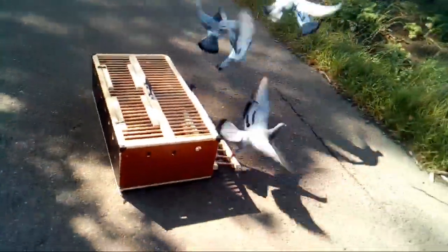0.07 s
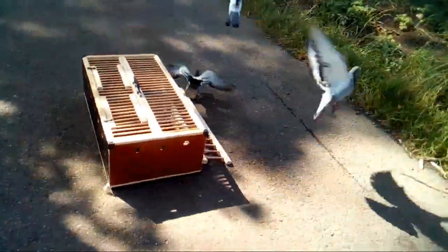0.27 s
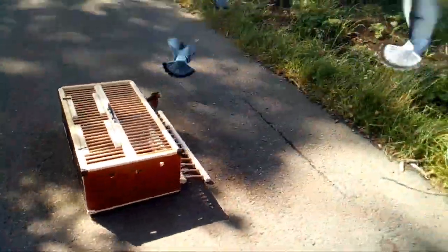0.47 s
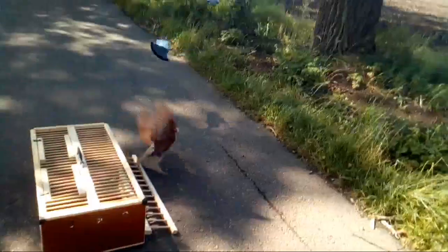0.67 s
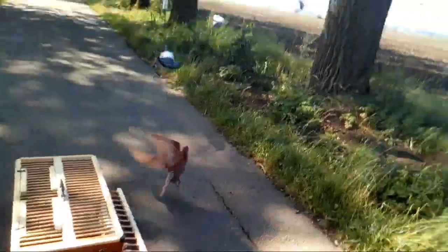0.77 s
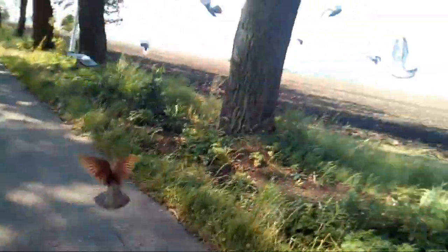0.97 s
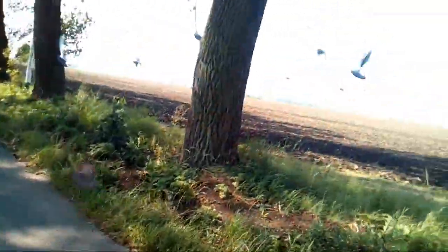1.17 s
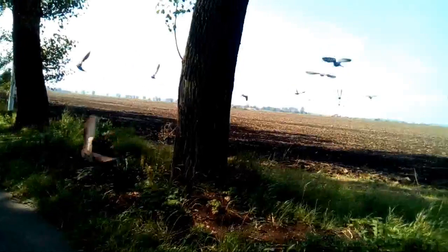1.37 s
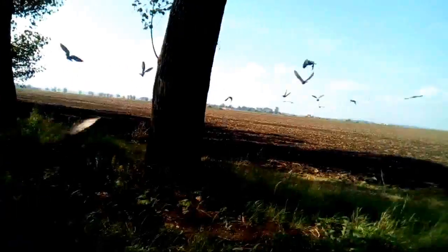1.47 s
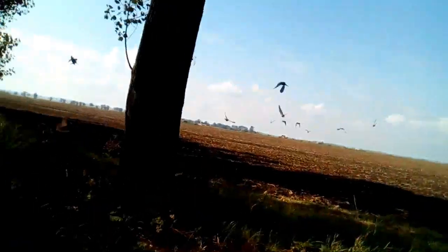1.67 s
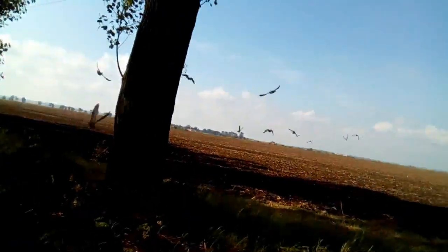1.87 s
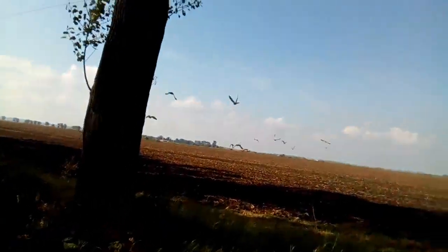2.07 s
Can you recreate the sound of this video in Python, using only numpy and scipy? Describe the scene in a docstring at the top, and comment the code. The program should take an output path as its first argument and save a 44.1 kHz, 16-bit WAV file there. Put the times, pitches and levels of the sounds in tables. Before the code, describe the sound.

Pigeons burst into flight close to the microphone outdoors, their wings clapping and fluttering in an uneven flurry. The wingbeats thin out as the birds fly off, and a light breeze swells into low, thumping wind buffeting at the end.

```python
"""A country road: a flock of pigeons bursts from a basket and flies off over a field.
Wing tips clap, each downstroke pushes a whoosh of air and the feathers rustle, all fading with distance.
A light breeze touches a small microphone that rings near 4 kHz; at the end a gust buffets it."""
import sys
import numpy as np
from scipy import signal
from scipy.fft import rfft, irfft
from scipy.io import wavfile
from scipy.ndimage import uniform_filter1d

SR = 44100
rng = np.random.default_rng(int(sys.argv[2]) if len(sys.argv) > 2 else 0)


def inscribe(sig):
    """Save sig as 16-bit PCM at rate SR to the path in sys.argv[1].

    A 1-D sig is mono; a 2-D sig holds one channel per row.
    Samples are clipped to [-1, 1] before scaling.
    """
    pcm = np.round(np.clip(np.atleast_2d(sig).T, -1, 1) * 32767)
    wavfile.write(sys.argv[1], SR, pcm.astype(np.int16))


N = 93888
T = np.arange(N) / SR


def undb(db):
    """Decibels to gain."""
    return 10 ** (np.asarray(db) / 20)


def unit(x):
    """Scale to rms 1."""
    return x / np.sqrt(np.mean(x ** 2))


def fader(rows, column=1):
    """Gain over time from one dB column of a table."""
    rows = np.array(rows)
    return undb(np.interp(T, rows[:, 0], rows[:, column]))


def eq(x, points):
    """Minimum-phase filter through (Hz, dB) points, so nothing rings ahead of a hit."""
    size = 2 * len(x)
    hz, db = np.array(points).T
    bins_hz = np.maximum(np.fft.rfftfreq(size, 1 / SR), 1)
    gain = undb(np.interp(np.log(bins_hz), np.log(hz), db))
    cepstrum = irfft(np.log(gain))
    cepstrum[1:len(x)] *= 2
    cepstrum[len(x) + 1:] = 0
    return irfft(rfft(x, size) * np.exp(rfft(cepstrum)))[:len(x)]


def wander(per_second):
    """Smooth random movement with rms 1."""
    hold = max(int(SR / per_second), 2)
    steps = rng.standard_normal(N)[np.arange(N) // hold]
    return unit(uniform_filter1d(steps, hold))


# A clap's three tones: bright snap, mid body, crisp edge. Each row: frequency in Hz, gain in dB.
SNAP_EQ = [(300, -11), (1500, 5.5), (2900, 4), (3900, 3.5), (5400, -4), (6800, -13), (7900, -31),
           (15000, -42)]
BODY_EQ = [(80, -29), (250, -7), (700, -0.5), (1900, 5), (3000, -2), (4200, -19.5), (8000, -59)]
EDGE_EQ = [(2000, -21.5), (5000, 2), (6800, 8.5), (8000, -2.5), (10500, -3.5), (13000, -16), (15500, -10.5)]
# The wing claps. Each row: start in seconds, relative snap level in dB, body and edge in dB against
# the snap, snap pitch in Hz, feather decay in ms.
WING_CLAPS = [(.006, -29, -18, -18, 3620, 4.3), (.078, -28.5, -25.5, -24, 3680, 3),
              (.0855, -33, -9, -20, 3570, 2.6), (.1232, -27.5, -4.5, -20.5, 3760, 3.2),
              (.137, -25.5, -17, -22, 3950, 3.9), (.189, -32.5, 4.5, -32, 3700, 5),
              (0.2006, -26, -0.5, -20, 3680, 0.89), (0.225, -20.5, -9, -28, 3940, 6.3),
              (.234, -27, -22, -24, 3800, 3.8), (.2395, -34, -21, -17, 3800, 1.9),
              (0.3053, -28.5, 1.5, -22, 3300, 2.6), (.318, -36, 0, -32.5, 3700, 1.44),
              (0.3403, -32, 1, -33, 3820, 2.5), (0.3936, -23.5, -11, -26, 3950, 8.5),
              (0.4244, -30, -13, -17, 3670, 8.2), (0.4634, -23.5, -5, -23, 3700, 4.2),
              (0.4934, -21.5, -13.5, -31, 3600, 1.4), (0.5193, -19, -9.5, -30, 3030, 2.7),
              (.541, -27.5, -5, -22, 3830, 0.8), (0.5619, -21, -6.5, -32, 3800, 1.9),
              (.598, -37.5, 4.5, -36.5, 3400, 3.7), (0.61, -38, 3, -36.5, 3540, 3.5),
              (0.655, -29, -12, -34.5, 3400, 5.8), (0.6761, -19.5, -9.5, -29, 3960, .9),
              (.680, -19, -7.5, -32, 3500, 1.1), (0.7597, -27.5, -3, -27, 4000, 8.6),
              (0.8, -30, -4, -16, 3600, 0.76), (0.9731, -21.5, -4, -22.5, 3430, 3.2),
              (1.0079, -36, -3, -14, 3830, 3.4), (1.0251, -29.5, -1.5, -12, 3700, 0.44),
              (1.0829, -22.5, -3.5, -25, 3500, 4.9), (1.119, -31.5, -3, -25, 3800, 1.5),
              (1.194, -32.5, -6.5, -21, 3760, 3), (1.2662, -36, -9, -19, 4030, 1.6),
              (1.3196, -30.5, -5.5, -25.5, 3660, 0.67), (1.351, -30.5, 0, -24, 4070, 4.9),
              (1.4201, -34, 2.5, -25, 3900, 4.2), (1.4298, -36, 2.5, -22, 3630, 1.2),
              (1.4917, -33, 1.5, -24, 4000, 5.6), (1.5507, -28.5, -2.5, -27, 3960, 1.6),
              (1.78, -28, -15, -23, 4060, 1.2), (1.898, -30.5, 0, -20, 4070, 3.2)]


def wing_claps(size=2048):
    """Wing tips meet: a crack, a spray of feather contacts and a bounce off the road."""
    feathers_db, bounce_db, trim_db = 1, -10, -13
    out, t = np.zeros(N), np.arange(size) / SR
    for start, db, body_db, edge_db, hz, decay_ms in WING_CLAPS:
        spray = unit(rng.standard_normal(size) * np.exp(-t * 1000 / decay_ms))
        hit = unit(signal.unit_impulse(size)) + undb(feathers_db) * np.sqrt(decay_ms) * spray
        bounce_s = .0025 * rng.uniform(.8, 1.2)
        hit = hit + undb(bounce_db) * np.roll(hit, int(bounce_s * SR))
        width_hz = min(3100 * undb(body_db), hz)  # a flat slap is broad, a tip flick rings narrowly
        ring = signal.lfilter(*signal.iirpeak(hz, hz / width_hz, SR), hit)
        snap = unit(eq(ring, SNAP_EQ))
        body = undb(body_db) * unit(eq(hit, BODY_EQ))
        edge = undb(edge_db) * unit(eq(hit, EDGE_EQ))
        onset = int(start * SR)
        out[onset:onset + size] += undb(db + trim_db) * (snap + body + edge)
    return out


def roadside_scatter(x, t60_s=.36, wet_db=-20.5):
    """Basket, verge and tree trunks scatter a short, faint tail."""
    tail = rng.standard_normal(N) * np.exp(-np.log(1000) * T / t60_s)
    return x + undb(wet_db) * signal.fftconvolve(x, tail / np.linalg.norm(tail))[:N]


def swirl(octaves=7, flicker_db=3):
    """Turbulent air: octave bands that each flicker on their own."""
    out = np.zeros(N)
    for hz in 100 * 2. ** np.arange(octaves):
        band = signal.lfilter(*signal.iirpeak(hz, np.sqrt(2), SR), rng.standard_normal(N))
        out += band * undb(flicker_db * wander(60.36))
    return out


# The full whoosh and the papery rustle. Each row: frequency in Hz, gain in dB.
WHOOSH_EQ = [(30, -21), (70, -0.5), (130, -3), (300, -0.5), (650, 1.5), (1300, -1), (2300, -5.5),
             (4000, -10.5), (6500, -26), (8000, -59.5), (15000, -79)]
RUSTLE_EQ = [(200, -22.5), (1200, -3.5), (2500, -15), (3200, -1.5), (3800, 3), (4800, -6.5), (5700, -15),
             (6700, -23.5), (7900, -38.5), (10500, -45), (14000, -34)]
# The flock fades away. Each row: time in seconds, whoosh level in dB, rustle level in dB.
FLOCK_FADE = [(0, -37.5, -45), (.2, -40, -40), (.36, -39.5, -39.5), (.52, -40, -42.5), (.66, -39.5, -38.5),
              (.82, -44.5, -43), (.95, -41.5, -44), (1.15, -47.5, -57), (1.42, -52.5, -66), (1.6, -60, -51),
              (2.13, -94, -58)]


def flapping(birds=5):
    """The birds beat out of step, each at its own rate; every stroke moves air and rustles feathers."""
    beat_hz, beat_drift, sharpness = 8.9, .03, 4.8
    waver_db, grain_db = 1.55, 3
    steady_share = .57  # rush of air between the strokes
    power = np.zeros(N)
    for bird in range(birds):
        rate_hz = beat_hz * (1 + beat_drift * wander(5.42))
        phase = np.cumsum(rate_hz) / SR + bird / birds
        downstrokes = np.exp(sharpness * (np.cos(2 * np.pi * phase) - 1))
        power += (downstrokes * undb(waver_db * wander(9.8))) ** 2
    strokes = unit(np.sqrt(power + steady_share ** 2 * power.mean()))
    whoosh = unit(eq(strokes * swirl(), WHOOSH_EQ))
    feathers = undb(grain_db * wander(900)) * rng.standard_normal(N)
    rustle = unit(eq(strokes * feathers, RUSTLE_EQ))
    return whoosh * fader(FLOCK_FADE, column=1) + rustle * fader(FLOCK_FADE, column=2)


# Single downstrokes that stand out as soft puffs.
# Each row: peak time in seconds, level in dB, band centre in Hz, half length in ms.
WING_PUFFS = [(.105, -34.5, 420, 6.9), (0.137, -37.5, 287, 5.5), (0.205, -33, 620, 7.2),
              (0.235, -38, 600, 6.7), (.32, -37, 377, 4.06), (.368, -41.5, 1180, 17),
              (0.42, -35.5, 391, 6.2), (.497, -41.5, 160, 4.4), (0.661, -42, 387, 7.5),
              (.835, -42.5, 433, 17), (1.18, -43.5, 287, 8.6), (1.221, -40.5, 457, 4.5),
              (1.536, -40.5, 1020, 3.8)]


def wing_puffs():
    """A wing close by shoves a short swell of air."""
    out = np.zeros(N)
    for peak_s, db, hz, half_ms in WING_PUFFS:
        band = signal.iirpeak(hz, Q=1, fs=SR)
        swell = np.exp(-.5 * ((T - peak_s) * 1000 / half_ms) ** 2)
        puff = signal.lfilter(*band, signal.lfilter(*band, rng.standard_normal(N))) * swell
        out += undb(db) * puff * np.linalg.norm(swell) / np.linalg.norm(puff)
    return out


# The wind's deep rumble and low-mid buffeting. Each row: frequency in Hz, gain in dB.
RUMBLE_EQ = [(25, -31), (50, -12.5), (95, -1), (150, -1.5), (220, -12), (400, -19), (1000, -39),
             (8000, -100)]
BUFFET_EQ = [(25, -30), (60, -23.5), (130, -5.5), (200, -3.5), (300, -2), (450, -11), (700, -15.5),
             (1000, -28), (1600, -51), (5000, -72), (15000, -105)]
# Light touches of breeze, then the gust. Each row: time in seconds, strength in dB.
WIND_STRENGTH = [(0, -50), (.12, -43), (.26, -54), (.7, -53), (.78, -41), (.87, -67), (.98, -60),
                 (1.06, -46.5), (1.14, -61), (1.18, -46.5), (1.39, -47), (1.47, -61), (1.705, -60.5),
                 (1.75, -36), (1.8, -32.5), (1.838, -27), (1.856, -41), (1.89, -27), (1.975, -29),
                 (2.055, -36.5), (2.13, -31.5)]


def wind():
    """A breeze rumbles at the microphone port; a higher buffeting grows faster as the wind rises."""
    rumble_db, buffet_db, full_gust_db, turbulence_db = -5, -2.5, -27.5, 2.2
    strength = fader(WIND_STRENGTH)
    rumble = undb(rumble_db) * unit(eq(rng.standard_normal(N), RUMBLE_EQ))
    turbulence = rng.standard_normal(N) * undb(turbulence_db * wander(160))
    buffet = undb(buffet_db) * unit(eq(turbulence, BUFFET_EQ))
    growth = (strength / undb(full_gust_db)) ** .45
    return strength * (rumble + buffet * growth)


# Thumps inside the gust. Each row: centre time in seconds, peak level in dB.
GUST_EDDIES = [(1.782, -20), (1.802, -19), (1.806, -19.5), (1.835, -20), (1.909, -18.5), (1.974, -25),
               (1.993, -20), (2.015, -18), (2.041, -20.5), (2.072, -21.5), (2.092, -22.5), (2.114, -21)]


def eddies(width_s=.00058):
    """The strongest eddies thump the microphone, each a single pressure swing."""
    out = np.zeros(N)
    for centre_s, db in GUST_EDDIES:
        offset = (T - centre_s) / (width_s * rng.uniform(.69, 1.4))
        out -= undb(db) * offset * np.exp((1 - offset ** 2) / 2)
    return out


# The background bed, with the microphone's ring near 4 kHz. Each row: frequency in Hz, gain in dB.
HUSH_EQ = [(25, 6), (90, 1.5), (200, -19), (500, -3), (1000, -5), (1700, -3.5), (2500, -4.5), (3100, 0),
           (3800, 5.5), (4700, -4), (5700, -12), (6600, -15), (7900, -31.5), (10000, -31), (13600, -38),
           (14800, -20.5), (16000, -30)]


def hush(level_db=-44.5, waver_db=.2):
    """Steady outdoor air with the microphone's own hiss."""
    return undb(level_db + waver_db * wander(6.3)) * unit(eq(rng.standard_normal(N), HUSH_EQ))


def scene():
    """Claps, flapping and puffs over wind and hush, in mono."""
    flock = roadside_scatter(wing_claps()) + flapping() + wing_puffs()
    return (flock + wind() + eddies() + hush())[None]


def record(dry, low_cut_hz=62, high_cut_hz=15700):
    """The recorder thins the deep bass and cuts the top."""
    thinned = signal.sosfilt(signal.butter(2, low_cut_hz, "high", fs=SR, output="sos"), dry)
    return signal.sosfilt(signal.ellip(12, .2, 70, high_cut_hz, fs=SR, output="sos"), thinned)


dry = scene()
out = record(dry)
inscribe(out)
```